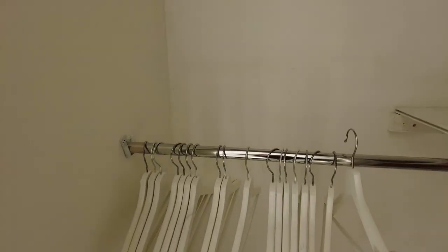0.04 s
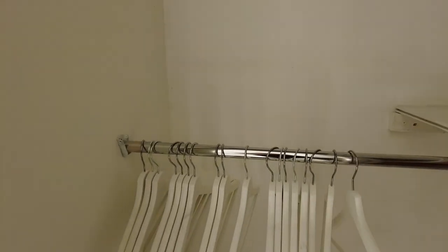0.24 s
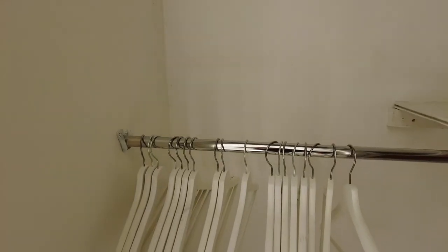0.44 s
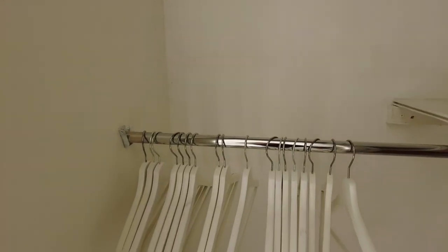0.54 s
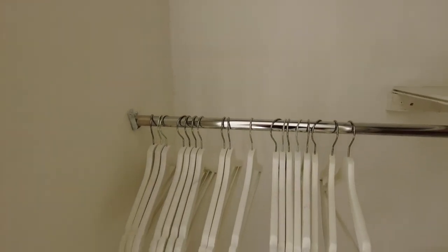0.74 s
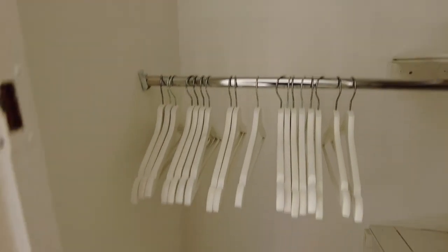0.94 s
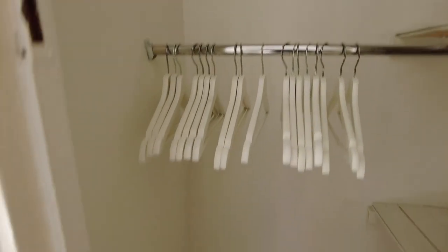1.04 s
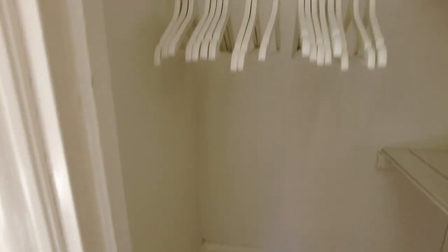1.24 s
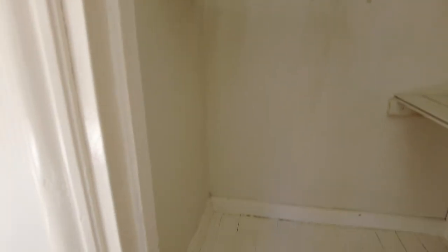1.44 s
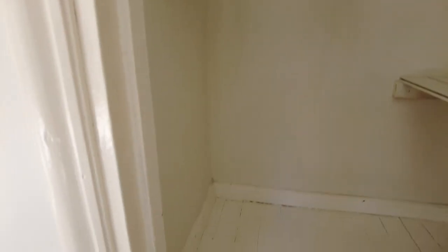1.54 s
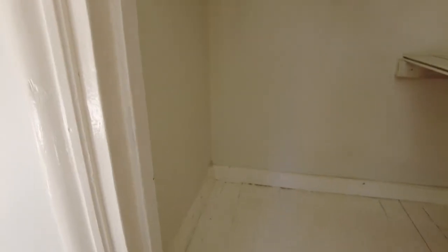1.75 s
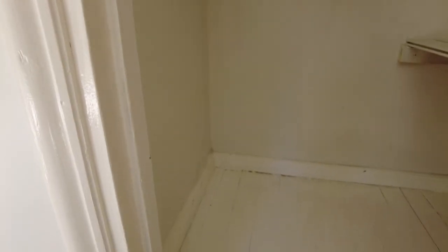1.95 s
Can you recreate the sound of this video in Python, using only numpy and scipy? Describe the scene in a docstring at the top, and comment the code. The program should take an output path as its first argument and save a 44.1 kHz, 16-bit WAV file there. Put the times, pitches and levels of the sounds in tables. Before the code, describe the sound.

A clothes hanger clacks onto a metal rail, then clothing swishes as someone steps back.

```python
"""Soft plastic bumps and a scrape, then a clack and its rebounds: a hanger is dropped onto a steel rail,
nudging its neighbours as its hook slides. Hangers, hooks and rail ring in the small bare closet, and
the swinging hangers tap and brush each other. Someone steps back with a scuff, a swish of clothing and
a soft footfall. A hand-held stereo microphone at the closet also hears room air and handling rumble."""
import sys
import numpy as np
from scipy import signal
from scipy.fft import rfft, irfft
from scipy.io import wavfile
from scipy.ndimage import uniform_filter1d

SR = 44100
rng = np.random.default_rng(int(sys.argv[2]) if len(sys.argv) > 2 else 0)


def wav_record(signal):
    """Record a signal, one row per channel, as 16-bit PCM in the file named by sys.argv[1]."""
    frames = np.transpose(np.atleast_2d(signal))
    bounded = np.clip(frames, -1, 1)
    # unit amplitude maps onto the largest positive 16-bit level
    quanta = np.round(bounded * 32767).astype(np.int16)
    wavfile.write(sys.argv[1], SR, quanta)


N = 88200
T, HZ = np.arange(N) / SR, np.arange(N // 2 + 1) * SR / N + 1e-3
PORT_GAP_M = .049  # distance between the microphone's two ports


def undb(db):
    """Decibels to gain."""
    return 10 ** (np.asarray(db) / 20)


def at(table, hz):
    """Read a table on a log-frequency axis."""
    freqs, values = np.array(table, float).T
    return np.interp(np.log(hz), np.log(freqs), values)


def noise(spectrum, tilt_db=0):
    """Diffuse coloured noise of rms 1 at the two ports: alike in the bass, unrelated in the treble."""
    coherence = np.sinc(2 * HZ * PORT_GAP_M / 343)
    phases = np.exp(2j * np.pi * rng.random((2, len(HZ))))
    mid, side = phases * np.sqrt([1 + coherence, 1 - coherence])
    colour = undb(at(spectrum, HZ) + tilt_db * np.log2(HZ / 1000))
    ports = irfft(np.array([mid + side, mid - side]) * colour, N)
    return ports / ports.std()


def fade(rise_s, t60_s):
    """Quick build-up and exponential decay."""
    return (1 - np.exp(-T / rise_s)) * np.exp(-np.log(1000) * T / t60_s)


def swell(peak_s, rise_s, fall_s, level_db):
    """A smooth rise to a peak level and a smooth fall."""
    width_s = np.where(T < peak_s, rise_s, fall_s)
    return undb(level_db) * np.exp(-((T - peak_s) / width_s) ** 2 / 2)


# Reverberation of the bare closet: freq_hz, t60_s
CLOSET_DECAY = [(100, .8), (1200, 0.92), (4000, .7), (16000, 0.28)]
# Colour of that reverberation: freq_hz, gain_db
CLOSET_COLOUR = [(200, 8.5), (1500, -2), (3000, -6), (8000, -12), (16000, -19.5)]
def clatter(hits, spectrum, t60s, rise_s, closet_db):
    """Blows on densely packed modes; each octave dies at its own rate, then lingers in the closet."""
    ripple = uniform_filter1d(rng.standard_normal(len(HZ)), size=110)
    peaks = undb(1.48 * ripple / ripple.std() * np.minimum(HZ / 2500, 1))  # the modes are uneven
    source = rfft(noise(spectrum)) * peaks / np.sqrt(np.mean(peaks ** 2))
    out = 0
    for hz in 16000 / 2. ** np.arange(9):
        band = irfft(source * np.maximum(1 - abs(np.log2(HZ / hz)), 0), N)
        direct = fade(rise_s, at(t60s, hz))
        reverb = undb(closet_db + at(CLOSET_COLOUR, hz)) * fade(.03, at(CLOSET_DECAY, hz))
        blow_power = direct ** 2 + reverb ** 2
        power = sum(undb(db) ** 2 * np.pad(blow_power, (int(s * SR), 0))[:N] for s, db in hits)
        out = out + band * np.sqrt(power)
    return out


# Standing waves set the two ports apart in phase: freq_hz, phase_rad
PORT_PHASE = [(100, 0.16), (330, 0.91), (617, 1.64), (850, 2.1), (1300, .61), (3000, 0.65)]
def ring(hits, modes, rise_s, rough):
    """Blows on distinct modes that swell into step, then beat; reflections make them uneven."""
    response, diffuse = 0, rfft(noise([(1, 0), (2, 0)]))
    for hz, mode_db, t60_s in modes:
        scatter = irfft(diffuse * np.exp(-((HZ - hz) / (25 + hz / 60)) ** 2), N)
        phase = at(PORT_PHASE, hz) * np.array([[-.5], [.5]])
        tone = np.sin(2 * np.pi * hz * (T - 3 * rise_s) + phase)
        response += undb(mode_db) * fade(rise_s, t60_s) * (tone + rough * scatter / scatter.std())
    return sum(undb(db) * np.pad(response, ((0, 0), (int(s * SR), 0)))[:, :N] for s, db in hits)


# The hand shifts on the microphone: peak_s, rise_s, fall_s, level_db
HAND_MOVES = [(.29, .04, 0.18, -51), (1.345, 0.027, 0.039, -56), (1.679, 0.18, 0.095, -55.5)]
# Handling rumble, then the air of the room: freq_hz, density_db
HAND_SPECTRUM = [(20, -8.5), (36, 0.5), (60, -14), (400, -63.5)]
AIR_SPECTRUM = [(12, -26), (20, 3), (64, -18), (103, -12), (219, -15), (290, -22), (1050, -36.5),
                (1500, -32), (15500, -47)]
def room():
    """Steady room air and the low rumble of the hand holding the microphone."""
    air = undb(-60.5) * noise(AIR_SPECTRUM)
    return air + noise(HAND_SPECTRUM) * sum(swell(*move) for move in HAND_MOVES)


# Clothing swishes by the closet: peak_s, rise_s, fall_s, level_db, tilt_db_per_octave
SWISHES = [(1.551, 0.0057, 0.014, -53.5, 3), (1.603, 0.023, 0.037, -36, 0.9),
           (1.654, 0.029, 0.039, -37.5, 0.5), (1.732, 0.025, 0.085, -48.5, 0), (1.995, 0.041, .04, -51, 0)]
# Sliding cloth, a scuffing sole and a footfall: freq_hz, density_db
CLOTH_SPECTRUM = [(35, -31), (60, -11), (175, -5), (521, -4.5), (849, -9.5), (1260, -7.5), (2840, -7.5),
                  (8090, -14), (15500, -22)]
SCUFF_SPECTRUM = [(500, -5), (950, -20), (1350, -2.5), (1700, -11.5), (4400, -15), (15000, -34)]
STEP_SPECTRUM = [(60, -17), (170, 8), (900, -9.5), (1500, 2.5), (4600, -6.5), (15000, -30)]
def stepping_back():
    """A sole scuffs the floor, cloth slides in grainy swishes and a foot comes down."""
    grain = uniform_filter1d(rng.standard_normal(N), size=130)
    cloth = sum(noise(CLOTH_SPECTRUM, tilt) * swell(*swish) for *swish, tilt in SWISHES)
    scuff = noise(SCUFF_SPECTRUM) * swell(peak_s=1.527, rise_s=.099, fall_s=1, level_db=-60.5)
    step = clatter(hits=[(1.9035, -45)], spectrum=STEP_SPECTRUM,
                   t60s=[(150, .3), (1500, .16), (5000, .06)], rise_s=.0004, closet_db=-22)
    return (cloth + scuff) * undb(.95 * grain / grain.std()) + step


# Hangers tap along the rail: start_s, level_db
TAPS = [(.544, -62), (1.1405, -52.5)]
# Hangers brush in passing: peak_s, level_db
BRUSHES = [(.835, -72), (.925, -69.5), (1.026, -62.5), (1.378, -70)]
# Noise of a light contact: freq_hz, density_db
TAP_SPECTRUM = [(200, -32), (900, -5.5), (1800, 3.5), (2700, -2), (3500, -2.5), (6000, -12.5), (15000, -34)]
# Ring of a tap: pitch_hz, relative_db, t60_s
TAP_MODES = [(865, -11, 0.43), (1315, -3, 0.39), (2020, -14, .14), (2060, -12, .16), (3410, -2, .12)]
def swinging_hangers():
    """Small hard contacts leave a short woody ring; glancing ones make a brighter brushing."""
    taps = clatter(TAPS, TAP_SPECTRUM, t60s=[(1000, .28), (6000, .16)], rise_s=.0012, closet_db=-7)
    body = undb(-1.5) * ring(TAPS, TAP_MODES, rise_s=.0013, rough=.78)
    brushing = sum(swell(s, rise_s=.0015, fall_s=.019, level_db=db) for s, db in BRUSHES)
    return taps + body + noise(TAP_SPECTRUM, tilt_db=6) * brushing


# The hook slides on the rail: peak_s, rise_s, fall_s, level_db
SCRAPES = [(.008, 0.043, 0.034, -46), (0.136, 0.019, 0.028, -49.5), (.209, 0.0073, 0.0025, -31.5),
           (.51, 0.019, 0.016, -59.5), (.64, .05, .04, -70)]
# Wire rubbing on steel: freq_hz, density_db
SCRAPE_SPECTRUM = [(300, -3), (2200, -9.5), (4300, 2.5), (6500, -8.5), (9300, -7.5), (15000, -20.5)]
def hook_scrapes():
    """Friction between hook and rail hisses in short swells."""
    return noise(SCRAPE_SPECTRUM) * sum(swell(*scrape) for scrape in SCRAPES)


# Soft bumps as the hanger goes in among the others: start_s, relative_db
BUMPS = [(.004, -40.5), (.015, -35), (.056, -44.5), (.092, -49.5)]
# Their dull thud: freq_hz, density_db
BUMP_SPECTRUM = [(60, -9.5), (250, 1), (1600, -7), (2500, -15.5), (12000, -39)]
# Ring of the bumped hanger and of its neighbours: pitch_hz, relative_db, t60_s
BUMP_MODES = [(216.5, -7, 0.67), (274.2, -6.5, 0.25), (336, -1, .22), (507, -6.5, .4), (589, -2, 0.22),
              (841, 4, 0.17)]
NEIGHBOUR_MODES = [(778, -9.5, 0.34), (839.3, -1.5, 0.3), (860, -7.5, 0.2), (906, -9.5, 0.11),
                   (964, -14, .33), (1075, -13.5, 0.15), (1442, -16.5, 0.27)]
def hanger_bumps():
    """The hanger nudges its neighbours with a thud, and the plastic rings on both sides."""
    thud = clatter(BUMPS, BUMP_SPECTRUM, t60s=[(200, .21), (4000, .082)], rise_s=.00033, closet_db=-17)
    body = ring(BUMPS, BUMP_MODES, rise_s=.003, rough=.75)
    neighbours = ring(BUMPS, NEIGHBOUR_MODES, rise_s=.0034, rough=.26)
    return undb(1.5) * thud + body + undb(-11.5) * neighbours


# Landing and rebounds on the rail: start_s, clatter_db, hanger_db, neighbours_db, hook_db
CLACKS = [(.208, -14, -15.5, -20.5, -39), (.22, -21.5, -32, -23, -50.5), (.272, -23, -47, -39, -38.5),
          (.302, -37, -63, -27.5, -68), (.368, -70, -53, -38.5, -52), (.433, -71, -43, -46, -65)]
# Bright clatter of a clack: freq_hz, density_db
CLACK_SPECTRUM = [(100, -15.5), (200, -2.5), (450, -6), (850, 5), (1100, -5), (1350, 2.5), (1600, -5),
                  (1870, 2.5), (2200, -6), (4000, 0), (9300, 1.5), (12000, -1.5), (16000, -11)]
# How fast that clatter dies: freq_hz, t60_s
CLACK_DECAY = [(100, 0.58), (800, .33), (2500, 0.34), (8000, 0.21), (16000, 0.25)]
# Faint hook pings after the rebounds: start_s, level_db
PINGS = [(.544, -70), (.612, -79)]
# Ring of the plastic body, wire hook, high pings and steel rail: pitch_hz, relative_db, t60_s
HANGER_MODES = [(330.7, -14, 0.44), (588, -8, 0.18), (613.2, 2.5, 0.34), (722, -11.5, 0.073),
                (1328, -15, .28), (2853, -17, 0.41)]
HOOK_MODES = [(2440, -5.5, 0.18), (3131, -1.5, .8), (3287, -10.5, 0.67)]
PING_MODES = [(3190, -7, 0.73), (4247, -2, 0.9), (5600, -8, 0.57), (9200, -8.5, 0.58)]
RAIL_MODES = [(94.5, -2.5, 0.98), (169, 1, 0.68), (201.5, -2, 0.48), (208.6, -3.5, 1), (228.3, -3, .45),
              (268.2, 1.5, .4)]
def hanger_clacks():
    """Each clack rings plastic and wire and shakes the neighbours; the landing sets the rail booming."""
    clacks, body_hits, neighbour_hits, hook_hits = (np.array(CLACKS)[:, [0, i]] for i in range(1, 5))
    crack = clatter(clacks, CLACK_SPECTRUM, CLACK_DECAY, rise_s=.0018, closet_db=-14.5)
    body = ring(body_hits, HANGER_MODES, rise_s=.012, rough=.27)
    neighbours = ring(neighbour_hits, NEIGHBOUR_MODES, rise_s=.009, rough=.59)
    hook = ring(hook_hits, HOOK_MODES, rise_s=.002, rough=.12)
    pings = ring(PINGS, PING_MODES, rise_s=.002, rough=.9)
    rail = ring([(.214, -32.5)], RAIL_MODES, rise_s=.026, rough=.55)
    return crack + body + neighbours + hook + pings + rail


def scene():
    """Everything that reaches the microphone's two ports."""
    return (room() + stepping_back() + swinging_hangers()
            + hook_scrapes() + hanger_bumps() + hanger_clacks())


def record(dry):
    """The recorder cuts the treble steeply above 15.9 kHz."""
    return signal.sosfilt(signal.ellip(10, .2, 80, 15900, fs=SR, output="sos"), dry)


dry = scene()
out = record(dry)
wav_record(out)
```